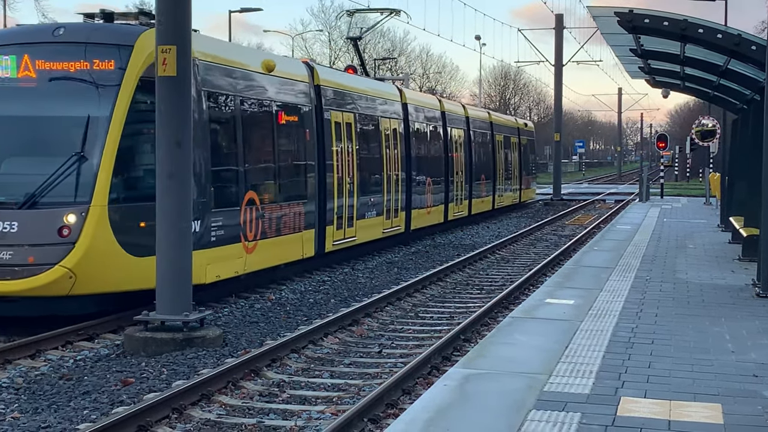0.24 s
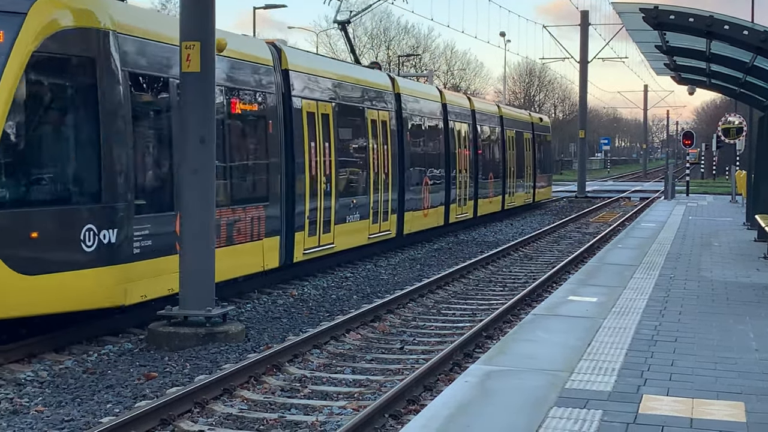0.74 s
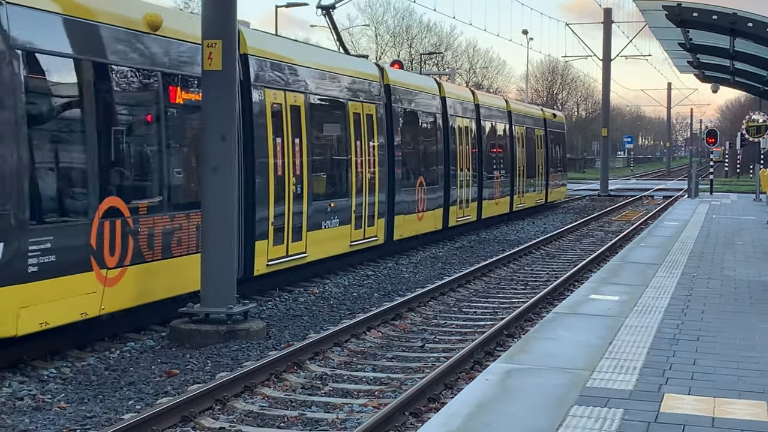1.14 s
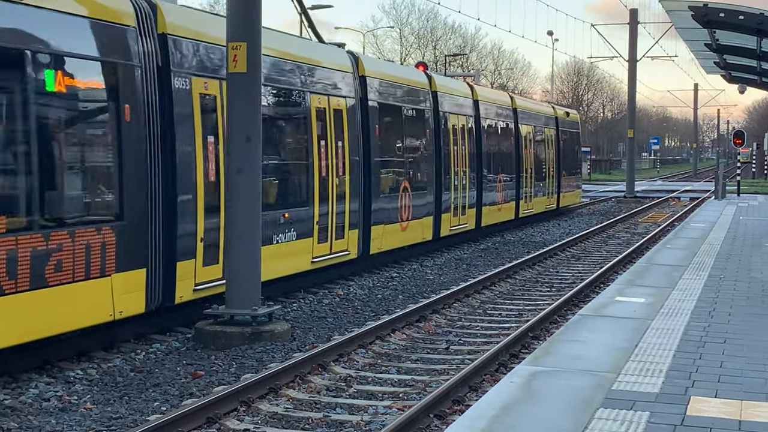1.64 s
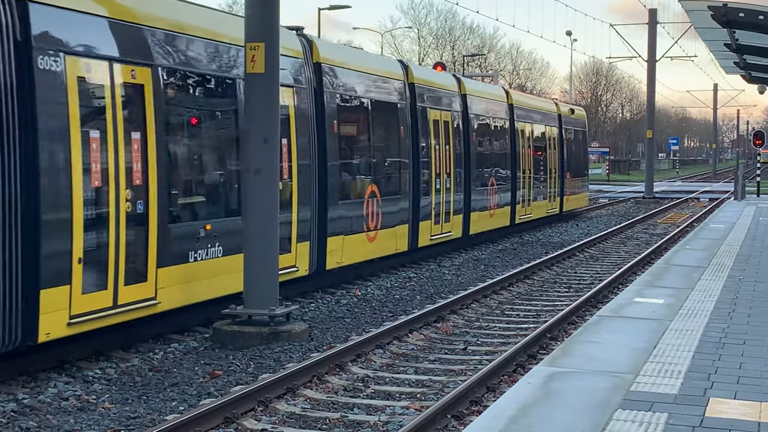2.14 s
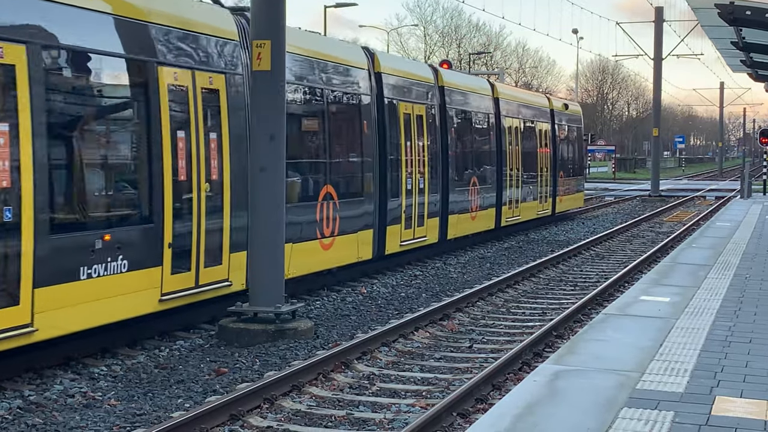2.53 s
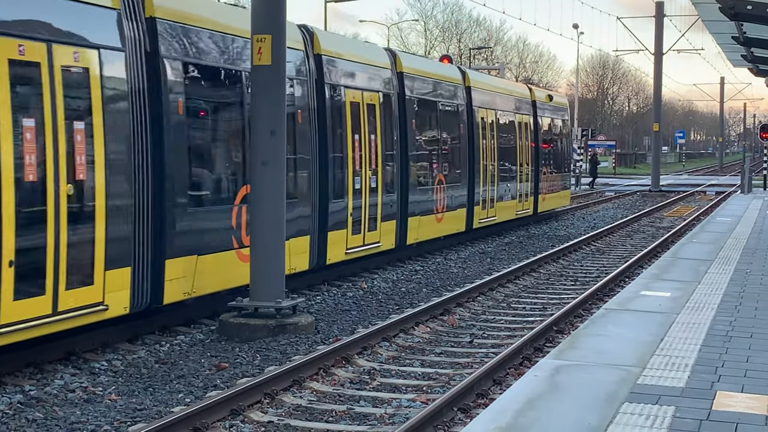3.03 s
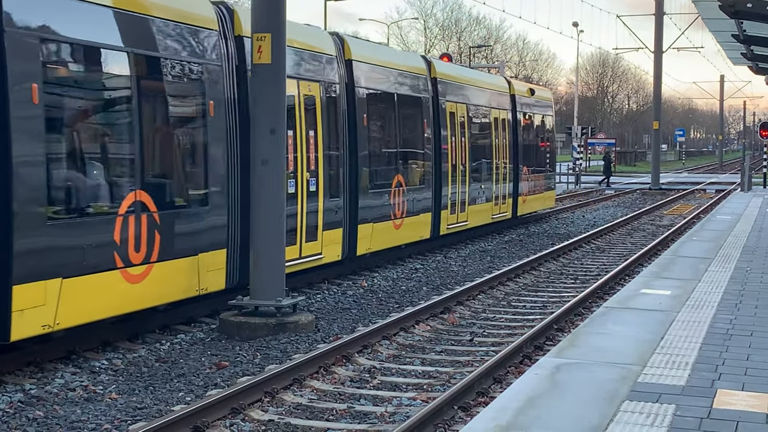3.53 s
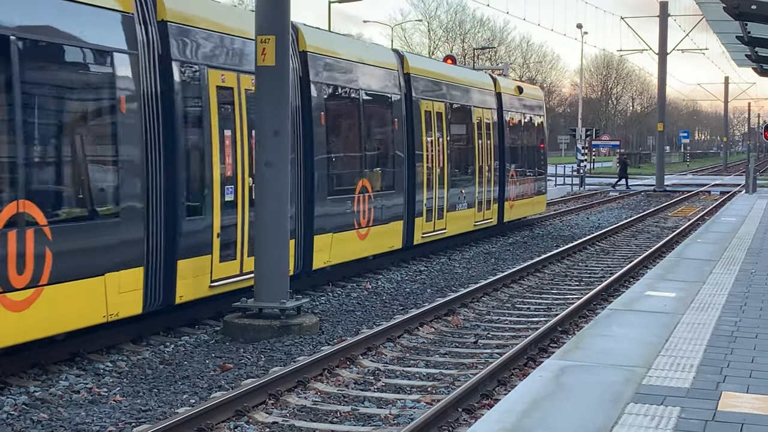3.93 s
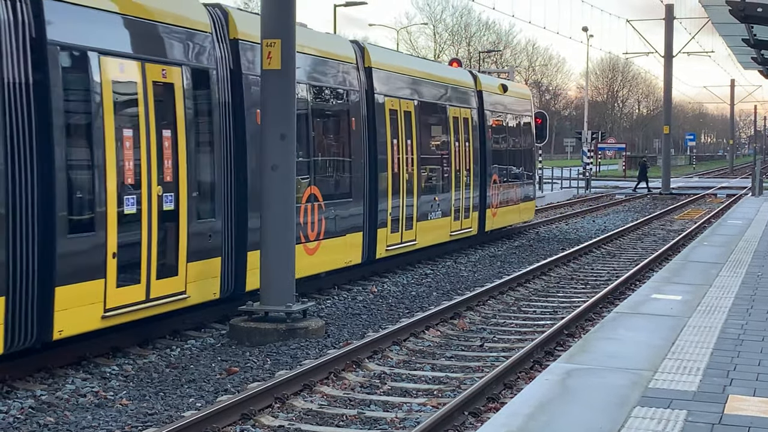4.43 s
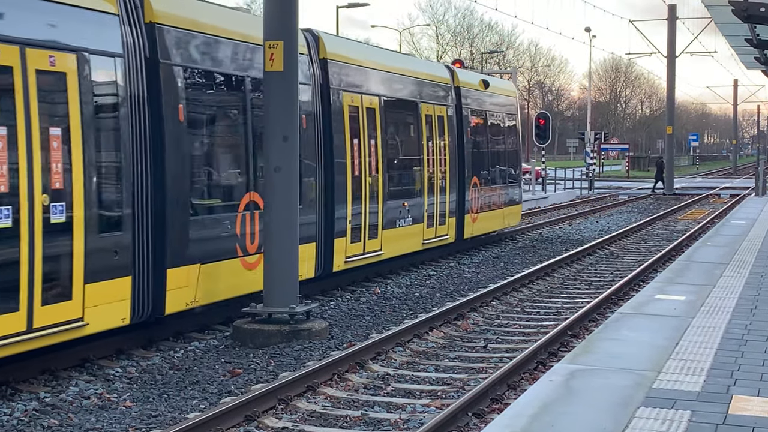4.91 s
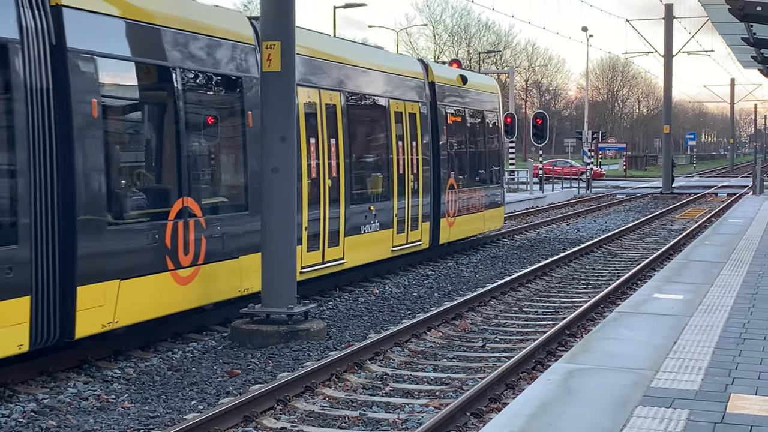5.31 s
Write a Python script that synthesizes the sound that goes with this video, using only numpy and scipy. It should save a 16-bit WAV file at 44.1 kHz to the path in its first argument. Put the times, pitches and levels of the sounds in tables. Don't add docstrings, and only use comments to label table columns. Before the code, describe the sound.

Continuous rumble and airy rolling hiss of a tram passing close by, already present at the start and fullest around the middle. Dull low thuds come in clusters, with a faint ringing rail beneath. The thin electric whine sags, clicks over to a higher pitch near the end, and a low hum rises. Wire ticks crackle late. Open air, phone stereo microphones.

```python
import sys
import numpy as np
from scipy import signal
from scipy.fft import rfft, irfft
from scipy.io import wavfile
from scipy.ndimage import uniform_filter1d, map_coordinates

SR = 44100
rng = np.random.default_rng(int(sys.argv[2]) if len(sys.argv) > 2 else 0)


def dump(signal):
    limited = np.clip(np.atleast_2d(signal).T, -1, 1)
    pcm = np.round(limited * 32767).astype(np.int16)
    wavfile.write(sys.argv[1], SR, pcm)


def how_loud(loudness_db):
    steps = np.asarray(loudness_db, float) / 20
    return 10 ** steps


N = 245194
T = np.arange(N) / SR
F = np.maximum(np.arange(N // 2 + 1) * SR / N, 1)
STEP_S, STEP_LENGTH_S, STEP_DROP_DB = 4.55, 0.01, -17


def unit(x):
    return x / np.sqrt(np.mean(x ** 2))


def along(table):
    s, *columns = np.transpose(table)
    return [np.interp(T, s, c) for c in columns]


def across(table):
    hz, value = np.transpose(table)
    return np.interp(np.log(F), np.log(hz), value)


def walk(rate_hz):
    hold = max(int(SR / rate_hz), 1)
    held = np.repeat(rng.standard_normal(N // hold + 1), hold)
    return unit(uniform_filter1d(uniform_filter1d(held, hold), hold)[:N])


def passes(s, half_width_s):
    return 1 / (1 + ((T - s) / half_width_s) ** 2)


def begins(s, length_s):
    return (1 + np.tanh((T - s) / length_s)) / 2


def near(x, lead_samples):
    return np.array([x, map_coordinates(x, [np.arange(N) - lead_samples], order=3, mode="nearest")])


# freq_hz, lead_rad
PORT_LEAD = [(1, 0), (950, 2.2), (3270, 9.3), (3790, 11.9), (6460, 19.3), (8700, 7 * np.pi),
             (15000, 11 * np.pi), (22050, 15 * np.pi)]


def ports(spectrum):
    lead = np.exp(.5j * np.interp(F, *np.transpose(PORT_LEAD)))
    return spectrum * [lead, lead.conj()]


# freq_hz, share
PORT_ALIKE = [(30, 0.77), (150, 0.94), (300, 0.95), (600, 0.89), (900, 0.38), (3000, 0.38), (7000, 0.33),
              (9000, 0.96), (14000, 1)]


def wide(gain):
    common, left, right = rfft(rng.standard_normal((3, N)))
    alike = np.clip(across(PORT_ALIKE), 0, 1)
    apart = np.sqrt(1 - alike) * np.array([left, right])
    return irfft((np.sqrt(alike) * ports(common) + apart) * gain, N)


def tone(hz, db, width_hz, steady=0.):
    strands = irfft(rfft(rng.standard_normal((2, N))) / (1 + (2 * F / width_hz) ** 2), N)
    phase = 2 * np.pi * np.cumsum(hz * np.ones(N)) / SR
    in_phase = (steady + unit(strands[0])) * np.sin(phase)
    return how_loud(db) * unit(in_phase + unit(strands[1]) * np.cos(phase))


def flashes(table, width_hz, steady=1.1):
    s, hz, db, half_width_s = np.transpose(table)
    gain = sum(how_loud(d) * np.exp(-((T - a) / w) ** 2) for a, d, w in zip(s, db, half_width_s))
    return near(gain * tone(np.interp(T, s, hz), 0, width_hz, steady=steady), 20.7)


# filled_db, close_db, abeam_s, half_width_s, carrier_step_db
BAND_PASSAGE = [
    (1, 0.5, 1.65, 1, 0.5),
    (9.5, 6.5, 2.5, 1.6, -1.5),
    (7.5, 4.5, 3, 0.55, -1.5),
    (4.5, 3, 1.57, 2.1, 0),
    (3, 3, 2.8, 0.35, -1),
    (4.5, 7, 2.3, 2.1, -1.5),
    (12.5, 2.5, 2.6, 1.5, -4),
    (-2, 13, 2.8, 1.2, -5),
]


def parts():
    arrival_s = 1
    arrived, stepped = begins(1.28, arrival_s), begins(STEP_S, arrival_s / 4)
    return [filled_db * arrived + close_db * passes(s, half_width_s) + step_db * stepped
            for filled_db, close_db, s, half_width_s, step_db in BAND_PASSAGE]


# peak_s, gain_db, centre_hz
ROLLING_HEAVES = [(.1, -3, 2700), (0.21, -3, 2500), (.5, 2, 1200), (0.66, 5, 1200), (1.28, -2, 4600),
                  (3.3, -3.5, 140), (5.5, -4.5, 3600), (4.85, 3.5, 580), (5.05, 4, 580), (0.65, 11, 130),
                  (0.89, 11.5, 67), (1.23, 6, 200), (1.63, 7, 100), (1.65, 11.5, 81), (1.95, 17, 62.5),
                  (1.8, -2, 470), (2.49, 6, 214), (2.3, 0.5, 430), (3.3, -9, 94), (3.25, -1.5, 400),
                  (1.25, -5, 100), (4.0, -1, 210), (4.6, 4, 190), (2.56, 7.5, 266), (2.66, -1, 100),
                  (2.88, 5.5, 81.5), (2.77, -4, 124), (3.2, -5, 310), (2.8, 0, 99), (3.12, 0, 110),
                  (3.3, -0.5, 270), (2.4, -5.5, 410), (1.75, -2.5, 380), (.48, -6, 65), (3.8, -6.5, 99),
                  (3.41, 3, 120), (3.73, 7.5, 140), (4.17, 11.5, 84), (4.2, 6, 104.4), (4.8, 11.5, 76.5),
                  (4.61, 14, 73), (4.7, 0.5, 240), (4.9, 10.5, 67), (5.4, 8, 65), (5.3, 8, 200)]


def heave(hz):
    half_width_s, half_width_octaves = 0.056, 0.54
    db = 0
    for s, gain_db, centre_hz in ROLLING_HEAVES:
        if centre_hz / 2.5 < hz < centre_hz * 2.5:
            octaves = np.log2(hz / centre_hz) / half_width_octaves
            db = db + gain_db * np.exp(-octaves ** 2 - ((T - s) / half_width_s) ** 2)
    return db


# freq_hz, density_db_per_hz
ROLLING_COLOUR = [(22, -32), (45, -4), (100, -1.5), (200, -3.5), (370, -6.5), (470, -16.5), (700, -20),
                  (1500, -22), (2700, -25.5), (4500, -31.5), (5300, -41), (8000, -40.5), (10300, -50.5),
                  (12000, -50.5), (13600, -49), (15000, -52)]
BAND_EDGES_HZ = (85, 140, 450, 1600, 4800, 9000, 12000)


def rolling(flicker_db=1.5, swell_db=.35):
    levels, out = parts(), 0
    colour = how_loud(across(ROLLING_COLOUR)) / (1 + (F / 13800) ** 24)
    swell = walk(6.13)
    for hz in 20 * 2 ** np.arange(0, 10, .5):
        share = np.cos(np.pi / 2 * np.clip(2 * np.log2(F / hz), -1, 1))
        db = levels[np.searchsorted(BAND_EDGES_HZ, hz)]
        motion_db = db - db.mean() + heave(hz) + flicker_db * walk(14) + swell_db * swell
        out = out + wide(colour * share) * how_loud(motion_db)
    return unit(out) * how_loud(-31.5)


def blows(table, ring_s, rise_s):
    out, t = np.zeros(N + SR), np.arange(SR // 4) / SR
    shape = np.exp(-np.log(1000) * t / ring_s) * (1 - np.exp(-(t / rise_s) ** 2))
    for s, db, hz in table:
        phase = 2 * np.pi * hz * t
        blow = -shape * (np.sin(phase) + .9 * np.sin(1.9 * phase) + .3 * np.sin(2.7 * phase))
        out[int(s * SR):][:len(t)] += how_loud(db - 8.0) * blow / np.abs(blow).max()
    return near(out[:N], 26.0)


# start_s, peak_db, pitch_hz
JOINT_BLOWS = [(0.342, -20.5, 206), (0.599, -17.5, 115.5), (0.973, -13, 121.3), (1.538, -28, 120),
               (1.66, -17, 86.5), (1.929, -28, 92.5), (0.493, -21, 167), (.86, -19, 211), (2.001, -20, 197),
               (2.105, -28, 224), (2.47, -23, 214), (2.562, -21, 196.9), (2.632, -13, 185),
               (2.652, -12.5, 122), (2.78, -19, 154.6), (2.869, -38, 188), (2.913, -17, 166.4),
               (3.097, -32, 211), (3.235, -24, 151), (3.315, -29, 224), (3.963, -21, 151),
               (4.025, -25, 220), (4.38, -29, 167), (5.278, -22, 212.5), (3.332, -10.5, 120.2),
               (3.398, -9.5, 112.4), (3.784, -25, 152), (4.134, -16, 102.8), (4.529, -15, 198),
               (4.614, -19, 102.8), (4.667, -13.5, 186.7), (5.17, -39, 119)]


def joints():
    return blows(JOINT_BLOWS, ring_s=0.13, rise_s=0.0097)


# start_s, peak_db, pitch_hz
HARD_KNOCKS = [
    (3.0162, -11, 182),
    (3.0217, -1.5, 182),
]


def hard_knock():
    return blows(HARD_KNOCKS, ring_s=.03, rise_s=.007)


# start_s, peak_db, pitch_hz
PANEL_BOOMS = [
    (1.529, -31, 150.7),
    (2.49, -39, 275),
    (2.58, -38, 282),
    (3.401, -44, 100),
    (3.801, -19.5, 108.6),
    (4.141, -17, 101.6),
    (4.639, -27, 325.6),
    (5.17, -14, 102.1),
]


def booms():
    return blows(PANEL_BOOMS, ring_s=0.65, rise_s=0.0044)


# peak_s, pitch_hz, peak_db, half_width_s
BALLAST_THUDS = [(.97, 75, -33.5, .03), (1.55, 95, -32.5, 0.027), (2.64, 184.7, -33, 0.014),
                 (2.675, 115.8, -27, 0.016), (2.925, 159.7, -30.5, .015), (2.96, 225.4, -28.5, 0.022),
                 (3.047, 180, -30, 0.011), (3.07, 120.3, -31, 0.017), (3.155, 243.5, -30.5, 0.014),
                 (3.185, 384.4, -32, 0.013), (3.345, 129.7, -39, .015), (3.4, 241, -28.5, .012),
                 (3.435, 105, -29, 0.026), (3.8, 110, -33, .03), (4.47, 199.8, -33, 0.031),
                 (4.5, 79.6, -34, .03), (5.0, 70, -36, .04)]


def thuds():
    return flashes(BALLAST_THUDS, 17.0, steady=3.)


def motor(hz, first_db, second_db):
    core_db = first_db - 15 * begins(STEP_S, STEP_LENGTH_S) - 4.0
    core = tone(hz, core_db, 75.0, steady=0.62)
    skirt = tone(hz, first_db - 2.5, 224.0)
    return core + skirt + tone(1.96 * hz, second_db - 12, 480.0)


def flares(table):
    s, hz, db, half_width_s = np.transpose(table)
    gain = sum(how_loud(d) * passes(a, w) for a, d, w in zip(s, db, half_width_s))
    return np.interp(T, s, hz), 20 * np.log10(gain) + STEP_DROP_DB * begins(STEP_S, STEP_LENGTH_S)


FAST_HZ = 3017


def carrier(first_db, second_db):
    first = tone(FAST_HZ, first_db + 1, 170., steady=.15)
    return first + tone(2 * FAST_HZ, second_db + 1, 80., steady=1.1)


def overtones(first_db, second_db):
    third = tone(3 * FAST_HZ, second_db - 12, 150.)
    fourth = tone(4 * FAST_HZ, first_db - 20, 200.)
    return third + fourth + tone(5 * FAST_HZ, first_db - 24, 250.)


# time_s, carrier_hz, level_db
SLOW_CARRIER = [(0, 2018, -54.5), (.7, 2056, -49.5), (1.5, 2063, -51), (1.95, 2056, -44.5),
                (2.3, 2023, -44), (2.58, 2004, -42.5), (2.78, 2038, -43), (2.98, 2071, -46.5),
                (3.14, 2028, -44), (3.25, 2037, -44), (3.56, 2063, -43.5), (3.72, 2060, -46),
                (3.8, 2047, -45), (3.95, 2012, -49), (4.25, 1967, -50.5), (4.47, 1918, -48),
                (4.62, 2032, -51), (5.56, 2082, -56.5)]
# abeam_s, pitch_hz, peak_db, half_width_s
LOWER_SIDEBAND = [
    (1.1, 1878, -55, 0.77),
    (2.62, 1826, -46, 0.26),
    (3.5, 1805, -54, 0.22),
    (4.28, 1845, -49, 0.44),
]
# abeam_s, pitch_hz, peak_db, half_width_s
UPPER_SIDEBAND = [
    (1.25, 2253, -53.5, 0.55),
    (1.75, 2210, -80, 0.24),
    (3.4, 2189, -58, 0.65),
    (4.3, 2138, -54, 0.48),
]


def inverter(far_db=-5):
    hz, first_db = along(SLOW_CARRIER)
    stepped = begins(STEP_S, STEP_LENGTH_S)
    second_db = -57 + 11 * begins(1.8, .2) + 6 * passes(3.15, 1.3) + STEP_DROP_DB * stepped
    bearing_samples = 27.63 - 1.56 * T - 12.2 * passes(2.17, 0.56)
    sides = tone(*flares(LOWER_SIDEBAND), 117.0) + tone(*flares(UPPER_SIDEBAND), 310.0)
    slow = near(motor(hz, first_db, second_db) + sides, bearing_samples)
    slow = slow + how_loud(far_db) * np.array([motor(hz, first_db, second_db) for _ in range(2)])
    fast_db = -55 - 2 * (T - STEP_S), -69.5 + 13.5 * (T - STEP_S)
    nearest = irfft(ports(rfft(carrier(*fast_db) + overtones(*fast_db))), N)
    fast = nearest + np.array([carrier(*fast_db) for _ in range(2)])
    return slow + fast * stepped * how_loud(-2.5)


# peak_s, pitch_hz, peak_db, half_width_s
MOTOR_GLINTS = [(.07, 2050, -57, 0.06), (.58, 2070, -58, 0.036), (1.22, 2098, -55, .03),
                (1.38, 2075, -49, .04), (1.52, 2075, -44, .06), (1.62, 2086, -47, 0.034),
                (1.76, 2076, -46.5, 0.027), (1.86, 2040, -45.5, 0.018), (2.08, 2030, -43.5, .04),
                (2.24, 1900, -47, 0.021), (2.39, 1990, -50, 0.028), (2.57, 1970, -40.5, 0.045),
                (2.78, 2043, -40, 0.032), (3.14, 2020, -42, 0.048), (3.37, 2087, -44, .03),
                (3.55, 2070, -38, 0.068), (3.79, 2039, -40.5, 0.026), (4.2, 1975, -52, .03),
                (4.33, 1870, -55, 0.034), (4.43, 1848, -45, 0.034), (4.5, 1900, -56, 0.029),
                (4.82, 2035, -51, 0.047), (5.26, 2087, -54, .04)]


def glints():
    return flashes(MOTOR_GLINTS, 35.0)


# peak_s, pitch_hz, peak_db, half_width_s
CARRIER_STRANDS = [(.95, 1900, -53, 0.048), (1.02, 1790, -55, .04), (1.22, 2135, -48.5, 0.027),
                   (1.33, 2200, -50.5, 0.043), (1.42, 2150, -53, 0.045), (1.5, 2280, -53, .05),
                   (1.63, 1885, -53, .06), (1.78, 2170, -53, 0.046), (1.92, 1875, -56, .04),
                   (2.22, 2085, -49, .04), (3.95, 2090, -51, 0.039), (4.08, 1900, -50, 0.032),
                   (4.24, 2010, -49, 0.032), (4.36, 1973, -52, .05), (4.46, 1760, -58, .04),
                   (4.54, 2200, -44, .02)]


def strands():
    return flashes(CARRIER_STRANDS, 40.)


# peak_s, pitch_hz, peak_db, half_width_s
SECOND_FLASHES = [(1.3, 4000, -62, .06), (1.5, 4200, -61, 0.052), (1.72, 4050, -58, .05),
                  (1.9, 4150, -56, .06), (2.05, 4120, -53, .06), (2.15, 3916, -50.5, 0.03),
                  (2.28, 3965, -53, 0.054), (2.42, 3922, -43.5, 0.026), (2.49, 3860, -50, 0.027),
                  (2.59, 3900, -48.5, .05), (2.7, 4000, -50.5, 0.049), (2.85, 4040, -53, 0.059),
                  (2.98, 4034, -58, 0.055), (3.11, 4000, -51, 0.059), (3.22, 4030, -53, 0.038),
                  (3.3, 3935, -49, 0.024), (3.42, 3916, -56, 0.046), (3.55, 3995, -56, .06),
                  (3.68, 3965, -60, 0.037), (3.82, 3930, -62, 0.042), (3.95, 3950, -55, .06),
                  (4.07, 3987, -61, 0.045)]


def second_multiple():
    return flashes(SECOND_FLASHES, 290.0, steady=.3)


# pitch_hz, width_hz, level_db
RING_MODES = [
    (875, 180, -47.5),
    (2720, 160, -70),
    (4370, 92, -78),
    (5180, 140, -70),
    (6430, 50, -82),
    (6830, 200, -71),
    (10070, 300, -81),
    (10400, 63, -82.5),
]


def rings():
    rail_db = parts()[3]
    beat = how_loud(rail_db - rail_db.mean())
    out = 0
    for hz, width_hz, db in RING_MODES:
        ring = unit(wide(1 / (1 + (2 * (F - hz) / width_hz) ** 2)))
        out = out + how_loud(db + 1.0 * walk(11)) * beat * ring
    return out


# peak_s, pitch_hz, peak_db, half_width_s
RAIL_PINGS = [
    (.49, 865, -37, 0.025),
    (.62, 846, -48, .03),
    (1.11, 866, -41, .03),
    (1.41, 823, -36, .025),
    (1.7, 880, -45, 0.033),
    (2.45, 875, -52, 0.037),
    (4.58, 900, -46, 0.029),
    (4.69, 900, -51, 0.027),
    (5.0, 877, -41, .02),
    (5.4, 850, -52, .04),
]


def pings():
    return flashes(RAIL_PINGS, 52.0)


# time_s, pitch_hz, level_db
FLANGE_SQUEAL = [(2.66, 2750, -80), (2.73, 2850, -58), (2.8, 3030, -59), (2.86, 3120, -54),
                 (2.91, 3200, -52), (2.96, 3160, -56), (3.05, 3100, -80)]


def gear():
    hum = tone(220, -49 + 11.5 * begins(4.7, .12), 7.3, steady=4.4)
    return near(hum + tone(*along(FLANGE_SQUEAL), 60., steady=1.0), 11.8)


def ticks(table, decay_ms, width_hz, spark_db, lead_samples):
    out, t = np.zeros(N + SR), np.arange(1500) / SR
    decay = np.exp(-t * 1000 / decay_ms) + .12 * np.exp(-t * 200 / decay_ms)
    shape = decay * np.minimum(t * 4000 / decay_ms, 1)
    for s, db, hz in table:
        burst = rng.standard_normal(len(t)) * shape
        edges_hz = [hz - width_hz / 2, hz + width_hz / 2]
        scrape = signal.sosfilt(signal.butter(2, edges_hz, "band", fs=SR, output="sos"), burst)
        scrape = scrape + how_loud(spark_db) * np.diff(burst, prepend=0)
        out[int(s * SR):][:len(t)] += how_loud(db) * scrape / np.abs(scrape).max()
    return near(out[:N], lead_samples)


WIRE_LEAD_SAMPLES = -20.6
# start_s, peak_db, pitch_hz
WIRE_TICKS = [(3.206, -47, 6870), (3.35, -40, 6966), (3.357, -41, 6830), (3.372, -42, 7170),
              (3.3788, -48, 6850), (3.6085, -41, 7830), (3.6125, -44, 7630), (3.6525, -49, 6860),
              (3.6594, -47, 6740), (3.7251, -49, 7310), (3.748, -41, 7590), (3.7543, -42, 7180),
              (3.9018, -46, 7400), (3.9058, -47, 7140), (4.0011, -45, 7220), (4.0056, -45, 7240),
              (4.1044, -36, 7170), (4.1117, -48, 7390), (4.2094, -42, 7360), (4.2164, -43, 7620),
              (4.2222, -48, 7600), (4.3742, -49, 6740), (4.4002, -47, 7450), (4.4302, -49, 7580),
              (4.4339, -42, 7370), (4.5145, -46, 7300), (4.5227, -49, 6960), (4.5336, -50, 7530),
              (4.5381, -48, 7550), (4.7206, -46, 7070), (4.7529, -49, 7120), (5.0423, -30, 7280),
              (5.0501, -42, 6620), (5.0551, -39, 7180), (5.0642, -47, 6750), (5.0806, -43, 7460),
              (5.0841, -35, 7370), (5.0881, -40, 7370), (5.0916, -38, 7510), (5.3104, -49, 6140),
              (5.4131, -40, 6350)]


def collector():
    return ticks(WIRE_TICKS, .9, 2400.0, -28, WIRE_LEAD_SAMPLES)


# start_s, peak_db, pitch_hz
CONTACTOR_CLICKS = [
    (4.5122, -33, 3150),
    (4.5366, -34, 2250),
]


def contactor():
    return ticks(CONTACTOR_CLICKS, 2, 795.0, -51, -16)


# start_s, peak_db, pitch_hz
SHORT_RATTLES = [(.215, -46, 4400), (.552, -44, 5200), (5.039, -44, 7600), (5.047, -42, 6400),
                 (5.0415, -67, 15900), (5.06, -69, 16000), (5.07, -69, 16000), (5.083, -67, 16000),
                 (5.0415, -60, 11800), (5.06, -63, 11800), (5.083, -63, 11800), (5.0415, -45, 4600),
                 (5.085, -42, 4700), (5.0835, -38, 6400), (5.108, -44, 3500)]


def rattles():
    return ticks(SHORT_RATTLES, 4.3, 2200.0, -40, WIRE_LEAD_SAMPLES)


def scene():
    track = rolling() + joints() + hard_knock() + booms() + thuds()
    drive = inverter() + glints() + strands() + second_multiple()
    metal = rings() + pings() + gear()
    return track + drive + metal + collector() + contactor() + rattles()


def band_limit(x):
    return signal.sosfilt(signal.butter(12, 16400, fs=SR, output="sos"), x)


# freq_hz, balance_db
PORT_BALANCE = [(30, 4), (60, -1.5), (110, -2), (200, -0.5), (370, 1), (670, 3.5), (1220, 3), (2240, 2),
                (4090, 1), (7480, -2.5), (13700, 2)]


def record(dry):
    tilt = how_loud(across(PORT_BALANCE) / 2)
    mix = irfft(rfft(dry) * [tilt, 1 / tilt], N)
    return band_limit(mix)


dry = scene()
out = record(dry)
dump(out)
```